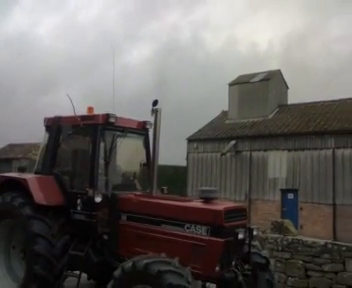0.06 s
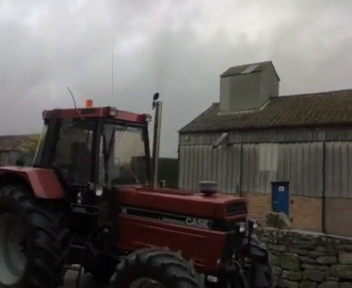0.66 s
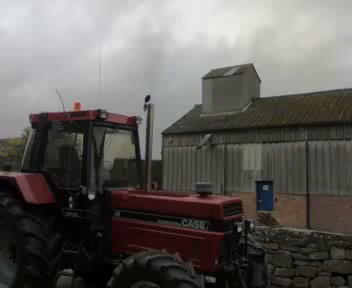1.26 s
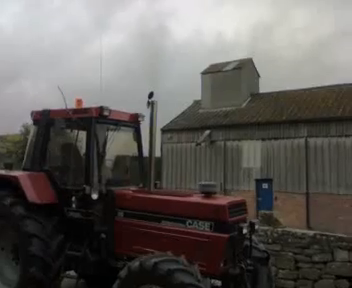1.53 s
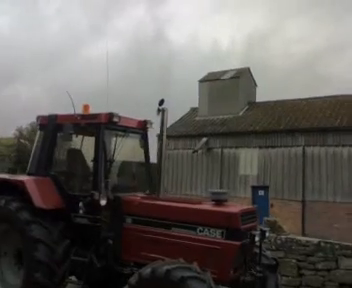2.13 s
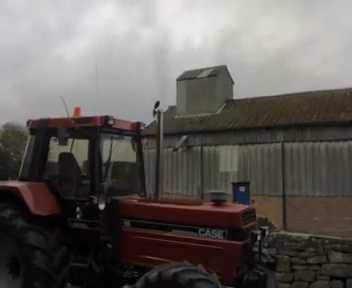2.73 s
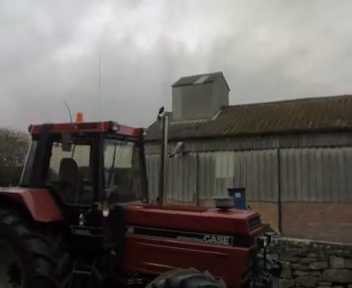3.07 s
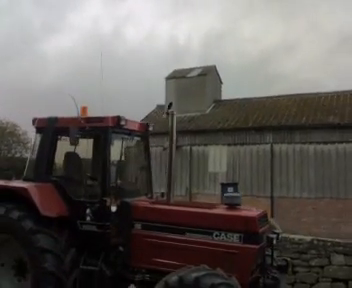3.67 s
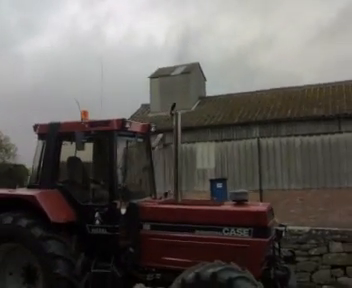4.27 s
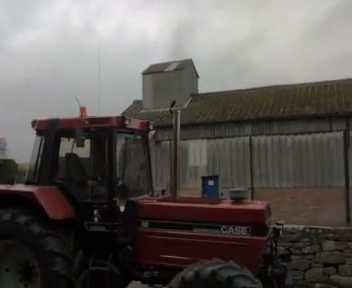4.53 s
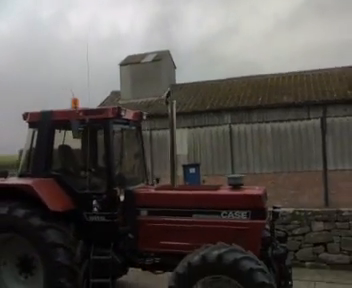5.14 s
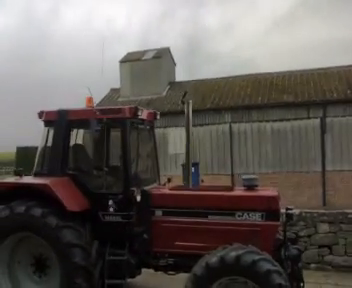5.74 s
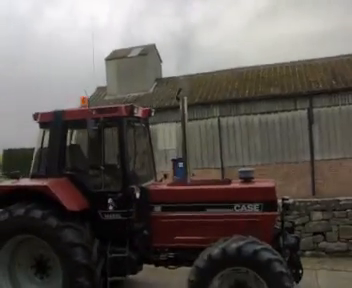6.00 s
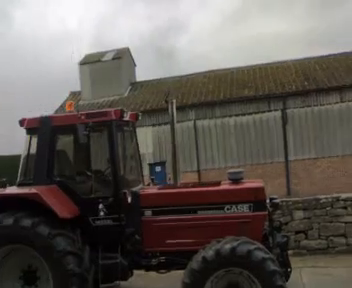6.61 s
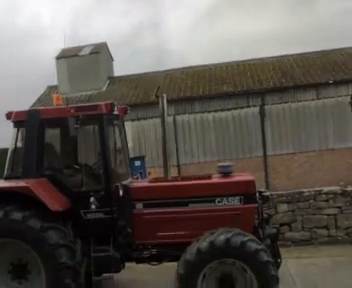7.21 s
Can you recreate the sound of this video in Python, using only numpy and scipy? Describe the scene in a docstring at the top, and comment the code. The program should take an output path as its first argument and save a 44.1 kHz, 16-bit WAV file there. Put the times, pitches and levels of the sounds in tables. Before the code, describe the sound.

Heard through a small microphone in a farmyard, a tractor's diesel engine runs continuously at high revs close by. The throbbing drone is mixed with mechanical clatter, rushing air and a light whine from the fan and gears. Different tones swell and fade as it rolls slowly by, then the low exhaust note builds into a louder boom over the last few seconds.

```python
"""A steady diesel drone over a rush of air: a six-cylinder tractor creeps past at high revs, a few
metres away in a farmyard, turning its side to us. The firings drone from the exhaust pipe and boom
near the end, while unequal cylinders add a throb. The engine's clatter repeats every cycle (two turns
of the crankshaft); a pump hums, the fan and gears sing, and a small microphone rounds the peaks."""
import sys
import numpy as np
from scipy import signal
from scipy.fft import rfft, irfft
from scipy.io import wavfile
from scipy.ndimage import map_coordinates

SR = 44100
rng = np.random.default_rng(int(sys.argv[2]) if len(sys.argv) > 2 else 0)


def master_out(mix):
    """Clip the mix to full scale and print it as 16-bit PCM to the path in sys.argv[1]."""
    frames = np.transpose(np.atleast_2d(mix))
    ceiling = np.clip(frames, -1, 1)
    pcm = np.round(ceiling * 32767).astype(np.int16)
    wavfile.write(sys.argv[1], SR, pcm)


N = 321047
TIME = np.arange(N) / SR
SIDE_ON = TIME / TIME[-1]  # 0 when the tractor faces us, 1 when we face its side
CYLINDERS = 6


def undb(db):
    """Turn decibels into a factor to multiply by."""
    return 10 ** (np.asarray(db) / 20)


def unit(x):
    """Scale a signal so that its average strength (rms) is 1."""
    return x / np.sqrt(np.mean(x ** 2))


def walk(rate):
    """A smooth random wobble, about 1 in size, that changes about `rate` times a second."""
    smooth = signal.resample(rng.standard_normal(1024), 1024 * 16)
    return np.interp(TIME * rate * 16, np.arange(len(smooth)), smooth)


def glide(start_s, end_s):
    """A smooth step from 0 to 1 between two times."""
    return (1 - np.cos(np.pi * np.clip((TIME - start_s) / (end_s - start_s), 0, 1))) / 2


def swell(at_s, half_width_s, db):
    """A bell-shaped rise in dB, or a dip if db is negative."""
    return db * np.exp(-((TIME - at_s) / half_width_s) ** 2)


def split(x, hz):
    """The parts of a sound below and above a frequency."""
    low = signal.sosfiltfilt(signal.butter(2, hz, fs=SR, output="sos"), x)
    return low, x - low


def tone(turns, db, flutter, rate, stray=1):
    """One wave per turn, wobbling in strength and timing, shifted at random by up to stray/2 turns."""
    angle = 2 * np.pi * (turns + stray * (rng.random() - .5)) + flutter * walk(rate)
    return np.sqrt(2) * undb(db) * (1 + flutter * walk(rate)) * np.sin(angle)


def heard_db(source):
    """How loud a tone is as the tractor turns and sound paths via ground and barn add up or cancel."""
    # each tone from two directions: source -> front level/dB, side level/dB
    views = {"firing": (-24, -23), "second": (-18, -16), "third": (-27.5, -29), "fan": (-23, -26.5),
             "pump": (-35.5, -32), "mesh": (-44, -39), "oil gear": (-30, -30.5), "whine": (-35, -41)}
    # where the paths add up or cancel: source, t/s, half-width/s, gain/dB
    swells = [("firing", 0.68, .42, -12), ("firing", 4.0, .45, -11), ("second", 2.5, 0.68, -9.5),
              ("second", 3.9, .45, 2.5), ("second", 5.15, 0.63, -3.5), ("third", 2.3, 0.49, 7.9),
              ("third", 3.7, .65, -10), ("third", 5.25, 1, 7.4), ("fan", 1.95, 0.5, -5),
              ("fan", 3.0, 0.36, 2.5), ("pump", 3.6, 1.8, 7.5), ("pump", 5.5, .5, 6),
              ("mesh", 1.4, 0.39, 11), ("mesh", 5.4, 1.2, 12), ("oil gear", 3.46, 0.95, -12),
              ("oil gear", 4.8, .3, 6), ("oil gear", 6.3, 0.68, 6.5), ("whine", .65, .25, 5),
              ("whine", 2.62, .85, 11.1)]
    front, side = views[source]
    swells_db = sum(swell(*row) for name, *row in swells if name == source)
    return front + (side - front) * SIDE_ON + swells_db


def with_echoes(x, scatter_gain=0.1, drift_ms=0.089, count=8):
    """Ground, wheels and cab add weak echoes that shift as the tractor rolls, so the sound shimmers."""
    # echoes off ground and bodywork: delay/ms, extra delay halfway past/ms, gain
    echoes = [(4.6, 0.37, 0.12), (2.58, 0.11, 0.053)]
    passing = np.sin(np.pi * SIDE_ON)
    paths = [(ms + extra * passing, gain) for ms, extra, gain in echoes]
    paths += [(ms + drift_ms * walk(0.806), scatter_gain) for ms in rng.uniform(5.5, 14, count)]
    copies = sum(gain * map_coordinates(x, [(TIME - ms / 1000) * SR], order=1) for ms, gain in paths)
    return x + split(copies, hz=810)[1]  # small surfaces send back only the highs


def bay_colour(x):
    """The engine bay and its ringing panels make some pitches louder than others."""
    # broad shape of the clatter and rush: f/Hz, relative level/dB
    shape = [(25, -26), (50, -14.5), (90, -8), (160, -1.5), (300, -1), (450, -0.5), (1000, -1.5),
             (1500, -1), (1950, -5.5), (2400, -7.5), (3400, -14), (5000, -19), (6000, -26), (7400, -32)]
    # ringing of engine block and bonnet: f/Hz, width/Hz, boost/dB
    panels = [(600.5, 66, 5), (828, 120, 3), (1045, 51, 2.5), (1275, 42, 2.5), (1865, 150, 2.5),
              (2330, 22, 2), (3000, 160, 1.5)]
    f = np.maximum(np.arange(N // 2 + 1) * SR / N, 1)
    hz, db = np.transpose(shape)
    gain_db = np.interp(np.log(f), np.log(hz), db)
    for centre, width, boost in panels:
        gain_db += boost / (1 + (2 * (f - centre) / width) ** 2)
    return irfft(rfft(x) * undb(gain_db), N)


def clatter(cycle, points=2508):
    """Valves and injectors strike alike every cycle; the pattern slowly changes as our view does."""
    place = cycle % 1 * points
    pattern = 0
    for at_s in np.linspace(0, TIME[-1], num=5):
        nearness = np.exp(-((TIME - at_s) / 1.2) ** 2)
        pattern += nearness * np.interp(place, np.arange(points), rng.standard_normal(points))
    _, strikes = split(unit(pattern), hz=200)
    knocks, ticks = split(strikes, hz=1100)
    return knocks + undb(-4) * ticks  # bright ticks sound 4 dB softer than the dull knocks


def firing_surge(cycle, depth=.058, uneven=0.036):
    """Each firing briefly lifts the noise, and each cylinder has its own strength."""
    firings = CYLINDERS * cycle
    cylinder = firings.astype(int) % CYLINDERS
    strength = 1 + uneven * unit(rng.standard_normal(CYLINDERS))[cylinder]
    puff = np.exp(-(firings % 1) / .25)
    return strength * (1 + depth * unit(puff - puff.mean()))


def engine_bay(cycle, clatter_db=-5.0, shade_db=-2.5):
    """The fan's rush and the clatter surge with each firing, over a low rumble."""
    surge = firing_surge(cycle)
    rumble, rush = split(rng.standard_normal(N), hz=300)
    noise = rumble + surge * (rush + undb(clatter_db) * clatter(cycle))
    low, high = split(unit(bay_colour(noise)), hz=850)
    bass, body = split(low, hz=330)
    middle, treble = split(high, hz=2000)
    # as the nose passes, the bonnet partly blocks the lower rush; the bass bends round it
    shaded = body * undb(shade_db * glide(5.9, 7.1))
    # the highs beam out of the grille and the side, and swell when a beam points at us
    grille_db, side_db = swell(4.24, 2, db=1.6), swell(6.8, 1.5, db=.8)
    treble *= undb(side_db - side_db.mean() + 0.38 * walk(10))
    beamed = (middle + treble) * undb(grille_db - grille_db.mean())
    return (bass + shaded + beamed) * undb(-16.0 + 0.22 * walk(12))


def pump(cycle, turns_per_cycle=3.14):
    """The pump shaft hums at its turning rate and an octave above."""
    turns = turns_per_cycle * cycle
    hum = tone(turns, heard_db("pump"), flutter=.06, rate=4.6)
    return hum + tone(2 * turns, -37.0, flutter=0.22, rate=7.3)


def fan(cycle, blades=10, turns_per_cycle=2.43):
    """Fan blades chop the air into a tone, and the slightly unbalanced fan hums as it spins."""
    turns = turns_per_cycle * cycle
    chop = tone(blades * turns, heard_db("fan"), flutter=0.033, rate=8.2)
    octave = tone(2 * blades * turns, -36.5, flutter=0.33, rate=7.2)
    imbalance = tone(turns, -46.0, flutter=.1, rate=5)
    return chop + octave + imbalance


def gears(cycle, teeth_per_cycle=42.86, oil_teeth_per_cycle=40):
    """The timing gears and the oil gear whine as their teeth meet."""
    # timing gear overtones: multiple of the tooth rate, front level/dB, side level/dB
    overtones = [(3, -48.5, -35.5), (4, -42, -46), (6, -56, -56.5)]
    teeth = teeth_per_cycle * cycle
    mesh = tone(teeth, heard_db("mesh"), flutter=0.11, rate=3.9)
    oil_gear = tone(oil_teeth_per_cycle * cycle, heard_db("oil gear"), flutter=0.2, rate=4.9)
    whine = tone(2 * teeth, heard_db("whine"), flutter=0.068, rate=11.0)
    for k, front, side in overtones:
        whine += tone(k * teeth, front + (side - front) * SIDE_ON, flutter=0.32, rate=4)
    return mesh + oil_gear + whine


def throb(cycle, smear=.012):
    """Unequal cylinders thump on every turn of the crankshaft; the colour shifts as the tractor turns."""
    # tones of the thump: multiple of the cycle rate (rounded for pitch), front level/dB, side level/dB
    thump_tones = [(4, -38, -43.5), (6.75, -32.5, -22), (8.8, -40.5, -29.5), (9.7, -23, -32),
                   (10.7, -46.5, -32.5), (13.76, -47, -28.5), (16.15, -35, -30.5), (20, -27, -27),
                   (21.94, -27, -32), (24.1, -22, -28.5), (25.9, -26.5, -27.5), (27.7, -39.5, -35),
                   (33.85, -35, -42.5), (38.3, -37.5, -36.5), (44.1, -31.5, -37.5), (46.1, -32, -39),
                   (50, -36.5, -39), (62.8, -34, -40.5), (65.9, -38, -43.5)]
    thump = 0
    for k, front, side in thump_tones:
        # pipe and silencer delay the higher tones, drawing the thump out
        turns = round(k) * cycle - smear * k ** 2 / 2
        thump += tone(turns, front + (side - front) * SIDE_ON, flutter=0.061, rate=3, stray=0.55)
    return thump


def exhaust(cycle, boom_db=13.5):
    """The exhaust pipe drones at one, two and three times the firing rate."""
    # the lowest tone booms once the pipe comes out from behind the bonnet
    lowest_db = heard_db("firing") + boom_db * glide(4.53, 6.9)
    levels_db = lowest_db, heard_db("second"), heard_db("third")
    return sum(tone(k * CYLINDERS * cycle, db, flutter=0.046, rate=9) for k, db in enumerate(levels_db, 1))


def firing_rate(set_hz=105.72, swing_hz=.3, period_s=1.9, settle_s=2.5, sag_hz=.59):
    """Firings per second: the speed control swings and settles, then the engine sags under load."""
    swing = np.cos(2 * np.pi * (TIME - .65) / period_s) * np.exp(-TIME / settle_s)
    return set_hz + swing_hz * swing - sag_hz * glide(3.2, 4.7)


def scene():
    """One slightly wavering crankshaft drives every part of the sound."""
    firing_hz = firing_rate() * (1 + 0.00049 * walk(10))
    cycle = np.cumsum(firing_hz) / SR / CYLINDERS  # engine cycles so far
    tones = exhaust(cycle) + throb(cycle) + pump(cycle) + fan(cycle) + gears(cycle)
    return (tones + with_echoes(engine_bay(cycle)))[None]


def record(dry, ceiling=0.67, top_hz=7430):
    """The microphone rounds the loudest peaks, and the highest treble is cut off."""
    rounded = dry / (1 + (dry / ceiling) ** 6) ** (1 / 6)
    return signal.sosfilt(signal.ellip(10, .1, 80, top_hz, fs=SR, output="sos"), rounded)


dry = scene()
out = record(dry)
master_out(out)
```